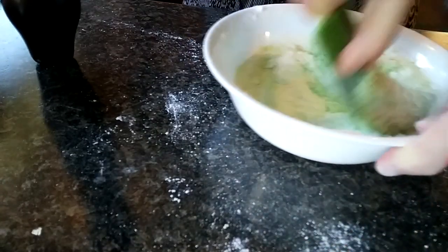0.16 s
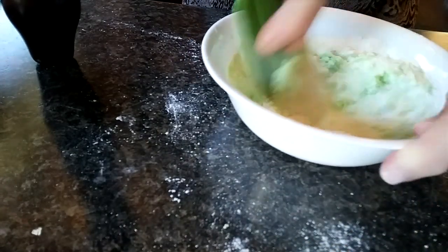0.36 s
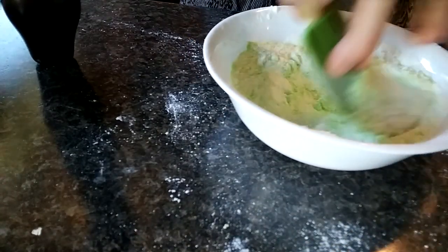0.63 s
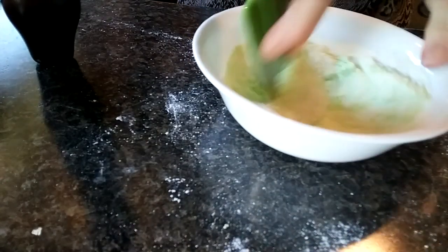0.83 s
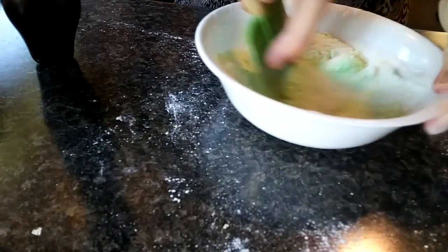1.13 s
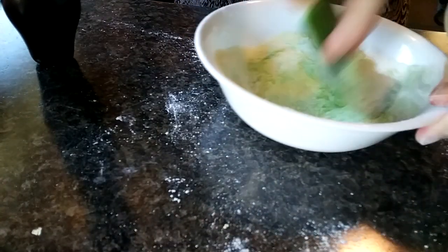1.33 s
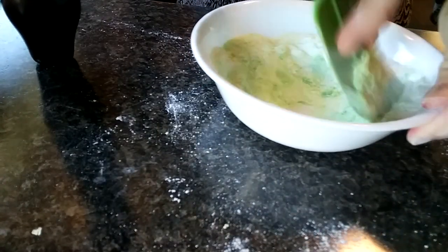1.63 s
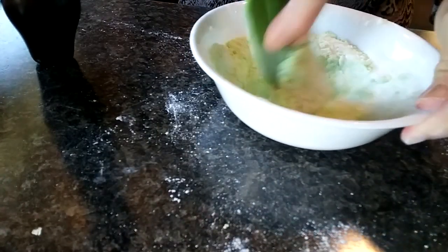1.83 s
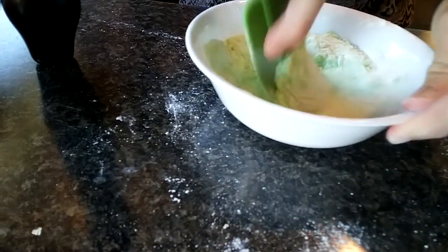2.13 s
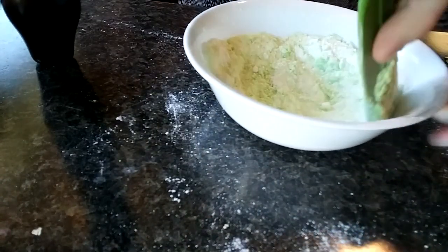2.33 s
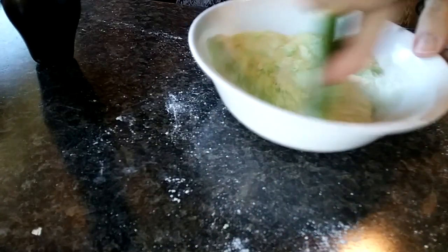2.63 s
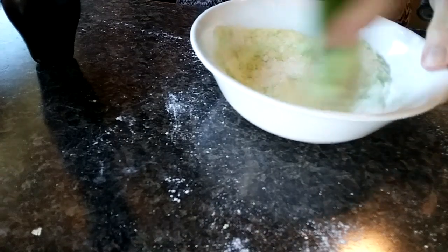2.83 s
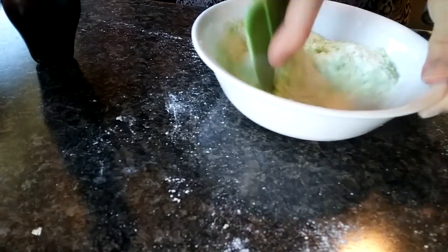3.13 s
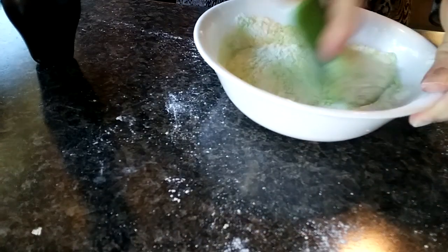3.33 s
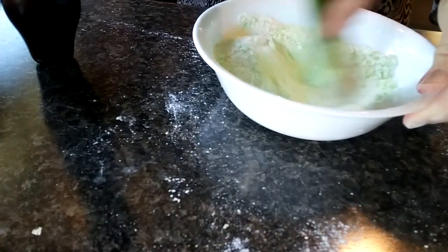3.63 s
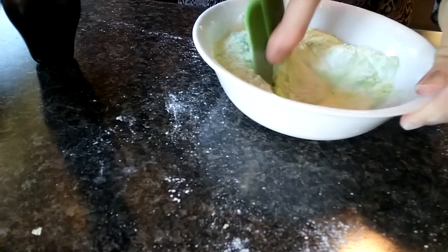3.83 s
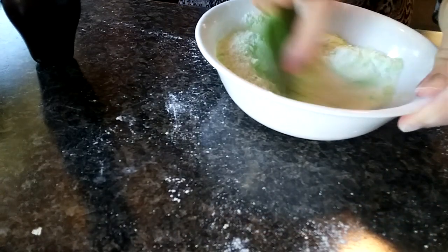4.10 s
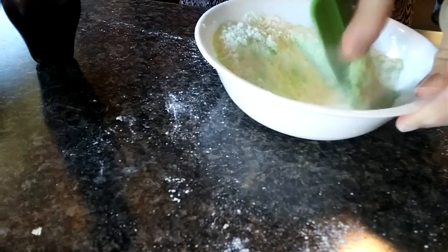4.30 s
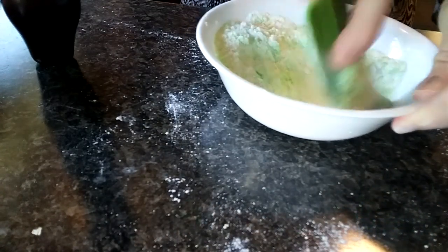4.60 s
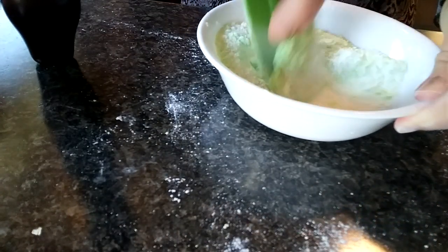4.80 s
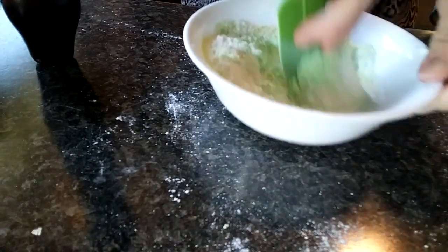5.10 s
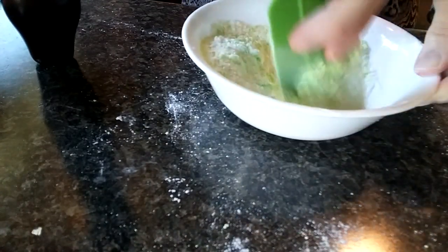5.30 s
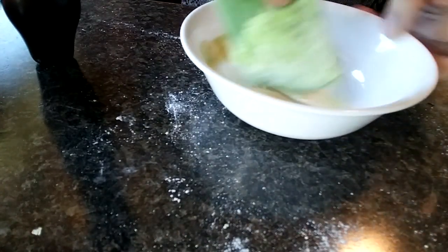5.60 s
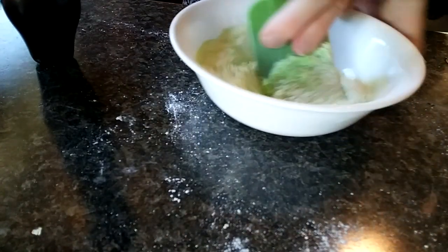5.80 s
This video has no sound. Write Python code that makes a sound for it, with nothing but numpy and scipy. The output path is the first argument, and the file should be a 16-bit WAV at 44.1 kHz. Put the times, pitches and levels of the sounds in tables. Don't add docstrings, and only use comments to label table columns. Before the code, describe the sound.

Close stereo pickup lying on a stone kitchen counter: a spatula sweeps damp sandy powder round a ceramic bowl, three or four uneven strokes a second. Each gives a gritty hiss, a crunch, a muffled ceramic knock and a low thud. The hardest blow comes near 1.2 seconds; near 3.3 the rim is rapped and rings briefly. Stirring continues to the end in a fairly dry room.

```python
import sys
import numpy as np
from scipy import signal
from scipy.fft import rfft, irfft
from scipy.io import wavfile

SR = 44100
rng = np.random.default_rng(int(sys.argv[2]) if len(sys.argv) > 2 else 0)


def ratio_of_db(decibels):
    return 10 ** (np.asarray(decibels, float) / 20)


def pcm_store(signal):
    levels = np.round(np.clip(np.atleast_2d(signal), -1, 1) * 32767)
    wavfile.write(sys.argv[1], SR, levels.astype(np.int16).T)


N = 262395


def rms_one(x):
    return x / np.sqrt(np.mean(x ** 2) + 1e-20)


def at_hz(points):
    hz = np.maximum(np.arange(N // 2 + 1) * SR / N, 1)
    corner_hz, value = np.array(points).T
    return np.interp(np.log(hz), np.log(np.maximum(corner_hz, 10)), value)


def colour(x, points):
    gain = rms_one(ratio_of_db(at_hz(points)))
    size = at_hz([(500, 0), (16000, 19.9)]).astype(int)
    late = rng.integers(0, SR, 20)[size] * np.arange(N // 2 + 1) / N
    return irfft(rfft(x) * gain * np.exp(-2j * np.pi * late), N)


def drift(rate):
    r = np.exp(-80 * np.pi * rate / SR)
    slow = signal.lfilter([1], [1, -2 * r, r * r], rng.standard_normal(N // 40 + 2002))[2000:]
    return np.interp(np.arange(N) / 40, np.arange(len(slow)), rms_one(slow))


def ring(force, hz, t60):
    r, w = ratio_of_db(-60 / (t60 * SR)), 2 * np.pi * hz / SR
    return signal.lfilter([0, np.sin(w)], [1, -2 * r * np.cos(w), r * r], force + 1e-18)


def grit(per_s, spread_db, alike):
    sizes = ratio_of_db(spread_db * np.minimum(rng.exponential(1, (2, N)), 4))
    sizes *= rng.choice([-1, 1], (2, N))
    mid, side = rms_one(sizes * (rng.random((2, N)) < per_s / SR))
    alike = np.clip(alike, 0, 1)
    return (np.sqrt(1 + alike) * mid + np.sqrt(1 - alike) * side * [[1], [-1]]) / np.sqrt(2)


def faster(modes, share):
    return [(hz, db, t60 * share) for hz, db, t60 in modes]


def rubbed(force, modes):
    flare_db, flares_per_s = 2.5, 12
    total = 0
    for k, (hz, level_db, t60) in enumerate(modes):
        level = ratio_of_db(level_db + flare_db * drift(flares_per_s))
        total = total + level * ring(force, hz, t60) * (-1) ** k
    return rms_one(total)


def strike(events, modes, vary_db, damping, width, press_s, detune=0):
    rows = np.array(events)
    at = np.round(rows[:, 0] * SR).astype(int)
    hard = rows[:, 2] if rows.shape[1] > 2 else np.zeros(len(at))
    share = rows[:, 3] if rows.shape[1] > 3 else np.ones(len(at))
    luck, side, load = np.moveaxis(rng.standard_normal((len(at), 3, len(modes))), 1, 0)
    hz, level_db, t60 = np.transpose(modes)[:, :, None]
    t, out = np.arange(SR // 4) / SR, np.zeros((2, N + SR))
    press = (1 - np.exp(-t / press_s)) ** 2
    for i, start in enumerate(at):
        tilt_db = hard[i] * np.log2(hz / modes[1][0])
        height = ratio_of_db(rows[i, 1] + level_db + tilt_db + vary_db * luck[i, :, None])
        decay = ratio_of_db(-60 * t / (t60 * damping * max(share[i], .05)))
        tone = np.sin(2 * np.pi * hz * (1 + detune * load[i, :, None]) * t)
        lean = width * side[i] * np.minimum(hz[:, 0] / 300, 1)
        out[:, start:start + len(t)] += np.array([1 + lean, 1 - lean]) @ (height * decay * tone * press)
    return out[:, :N]


def soft(x, contact_hz):
    return signal.sosfilt(signal.butter(3, contact_hz, fs=SR, output="sos"), x)


# (f/Hz, density/dB per Hz)
ROOM_TONE = [(30, -22), (70, -31), (200, -66), (550, -56), (1100, -6), (4000, -2), (7000, -8.5),
             (16000, -13)]


def room_tone():
    return ratio_of_db(-74.5) * colour(grit(40000, spread_db=.1, alike=.6), ROOM_TONE)


# (t/s, fade/ms, coarse level/dB, fine level/dB)
SWEEPS = [(0.039, 88, -46, -47), (0.294, 38, -59.5, -60), (0.404, 55, -40.5, -42), (0.829, 46, -53, -55),
          (0.921, 52, -36, -60), (1.139, 61, -48, -46.5), (1.251, 43.5, -36.5, -43.5),
          (1.444, 62, -55, -55.5), (1.572, 50.4, -43.5, -44.5), (1.886, 60.4, -45.5, -47.5),
          (2.102, 27, -45, -44), (2.194, 76, -45, -49), (2.508, 41, -88, -51.5), (2.682, 66, -48.5, -42),
          (2.85, 42, -43, -45.5), (3.206, 48, -47.5, -47), (3.35, 58, -64, -59), (3.63, 44.6, -48.5, -52.5),
          (3.927, 50, -46, -48), (4.02, 50, -65.5, -70), (4.121, 23, -53.5, -52.5), (4.33, 51, -63.5, -70),
          (4.46, 25, -64, -59), (4.63, 36, -68, -71), (4.221, 51, -44, -46), (4.53, 49, -42.5, -45.5),
          (4.844, 42.6, -40.5, -45), (4.968, 430, -67, -65), (5.263, 46.5, -42, -49),
          (5.491, 58, -46.5, -48), (5.558, 40, -50.5, -50), (5.895, 81, -51, -49)]
# (t/s, fade/ms, coarse level/dB, fine level/dB)
DIGS = [(0.108, 59, -57.5, -68), (0.468, 43, -46, -49.5), (0.538, 42, -63, -59), (0.6, 74, -73, -66),
        (0.687, 230, -64, -61), (0.978, 80, -47.5, -58.5), (1.28, 82, -44.5, -58),
        (1.628, 46, -53.5, -53.5), (1.788, 51, -44.5, -49.5), (2.387, 60, -46, -49.5),
        (2.495, 37, -61.5, -67), (2.73, 49, -44.5, -47.5), (2.925, 160, -54.5, -60.5),
        (3.049, 37, -46.5, -44.5), (3.096, 37, -51.5, -50.5), (3.278, 36, -48.5, -42),
        (3.415, 96, -58.5, -56), (3.5, 130, -59, -57), (3.56, 50, -60.5, -65), (4.421, 24, -51, -44.5),
        (4.756, 35, -55, -52), (5.133, 47, -40, -41.5), (5.682, 72, -50.5, -50.5), (5.736, 83, -54, -58),
        (5.795, 45, -55, -52.5)]


def drags():
    swell_share, dig_ms = 0.82, 16.8
    fine, coarse = np.zeros((2, N))
    clock = np.arange(N) / SR
    moves = [(swell_share * row[1], *row) for row in SWEEPS] + [(dig_ms, *row) for row in DIGS]
    for swell_ms, s, fade_ms, coarse_db, fine_db in moves:
        near = slice(max(round((s - .3) * SR), 0), round((s + .4) * SR))
        span_ms = np.where(clock[near] < s, swell_ms, fade_ms)
        away = np.abs(clock[near] - s) * 1000 / span_ms
        fine[near] += ratio_of_db(2 * (fine_db - 8 * away ** 1.8))
        coarse[near] += ratio_of_db(2 * (coarse_db - 9 * away ** 1.8))
    return fine, coarse


# (t/s, level/dB, coarse share/dB)
SNAPS = [(0.1373, -35, -0.5), (0.271, -34, -19), (1.1464, -16.5, -7.5), (1.783, -15.5, -30),
         (1.7984, -48, -9), (1.811, -24.5, 1.5), (2.7694, -50, -6.5), (3.262, -11, -31), (3.8044, -51, 1),
         (4.421, -26, -7.5), (5.212, -32, -15)]
# (t/s, level/dB, coarse share/dB)
SKIDS = [(0.253, -40.5, -18), (0.3501, -39.5, -3), (0.87, -35, -6), (0.9213, -41.5, 19),
         (1.1276, -23.5, -6.5), (1.437, -35.5, -6.5), (1.7683, -29, -7), (2.6, -30.5, -22),
         (3.03, -33, -11), (3.81, -32.5, -14), (4.746, -32.5, -11), (5.0534, -40, -7), (5.091, -37, -6),
         (5.1248, -40.5, 8), (5.1327, -25, -25), (5.475, -30.5, -8.5)]
# (t/s, level/dB, coarse share/dB)
CRUNCHES = [(0.6603, -32.5, -36), (0.79, -38, -29), (0.891, -25, -7), (0.9032, -24.5, 4.5),
            (1.2118, -16, -9.5), (1.2284, -10.5, -5.5), (1.483, -24, -6.5), (2.0703, -30.5, -8.5),
            (2.086, -12.5, -9.5), (2.111, -23, -4.5), (2.377, -32, -26), (2.6664, -28.5, -10),
            (2.915, -31, -7.5), (3.4092, -37, -15), (4.119, -36.5, -31), (4.404, -26, -16.5),
            (4.714, -45.5, -4), (5.08, -23, -13), (5.4219, -27, -7), (5.7818, -30.5, -41)]


def bites():
    fine, coarse = np.zeros((2, N))
    t = np.arange(4096) / SR
    for length_ms, table in [(5.4, SNAPS), (7.9, CRUNCHES), (19, SKIDS)]:
        shape = (1 - np.exp(-t / .002)) * np.exp(-(t * 1000 / length_ms) ** 1.6)
        for s, peak_db, coarse_db in table:
            at = round(s * SR)
            fine[at:at + 4096] += (ratio_of_db(peak_db - 10.5) * shape)[:N - at] ** 2
            coarse[at:at + 4096] += (ratio_of_db(peak_db + coarse_db - 3.0) * shape)[:N - at] ** 2
    return fine, coarse


def from_blade(x, swing):
    lag = swing * drift(4.63)
    return np.array([x[0], np.interp(np.arange(N) + lag, np.arange(N), x[1])])


def patchy(x, low_hz, high_hz, depth_db, rate):
    place = at_hz([(low_hz, 0), (high_hz, 11)])
    spectrum, total = rfft(x), 0
    for k in range(12):
        part = irfft(spectrum * np.sqrt(np.clip(1 - abs(place - k), 0, 1)), N)
        total = total + part * ratio_of_db(depth_db * drift(rate))
    return total / np.sqrt(2)


# (f/Hz, density/dB per Hz)
FINE = [(3000, -23), (4200, -7), (5500, -3.5), (6400, -1.5), (7500, -2), (10500, -0.5), (12500, -9),
        (16000, 1)]
# (f/Hz, density/dB per Hz)
COARSE = [(700, 5.5), (1100, -2), (1600, -1), (2200, -1), (3000, -0.5), (4000, -3.5), (6500, -20)]


def hiss(slip, fine_height, coarse_height):
    fine = colour(from_blade(grit(20000, spread_db=2.5, alike=0.22), swing=4.98), FINE)
    coarse = colour(from_blade(grit(8000, spread_db=5.5, alike=0.94), swing=6.28), COARSE)
    both = fine * fine_height * ratio_of_db(.5 * slip)
    both += coarse * coarse_height * ratio_of_db(-2.0 + 0.3 * slip)
    return patchy(both, 1040, 12770, depth_db=3.0, rate=28.6)


# (f/Hz, level/dB, t60/s)
GLAZE = [(1694, -18, 0.11), (1860, -27, 0.054), (2207, -3, 0.11), (2570, -40, 0.062), (2830, 16.5, 0.04),
         (3350, 12, 0.0044), (4410, 23, 0.015), (5550, 27.5, 0.0056), (6380, 18, 0.046), (6460, 13, 0.014),
         (7060, -27, 0.012), (7430, 11, 0.024), (10000, -11, 0.0098)]


def glaze(fine_height, coarse_height):
    sing = rubbed(grit(3000, spread_db=2.5, alike=0.17), faster(GLAZE, 0.44))
    return sing * np.hypot(fine_height, coarse_height) * ratio_of_db(-14.5)


# (f/Hz, level/dB, t60/s)
BOWL = [(428, -4, 0.03), (523.5, 0, 0.096), (559.8, -2, 0.22), (609.8, -3.5, 0.17), (671, -6, 0.17),
        (776.4, -1, 0.076), (868, -5, 0.081), (950, -12.5, 0.089), (1285, -10.5, 0.075),
        (1436, -12.5, 0.035), (1710, -13, 0.084), (2135, -12, 0.042), (2593, -20.5, 0.048)]


def drone(slip, drone_db, rock, coarse_height):
    shake_top = ratio_of_db(-34)
    body = rubbed(grit(1200, spread_db=4.0, alike=0.66) * ratio_of_db(1.9 * slip), faster(BOWL, 0.75))
    shake = shake_top * np.tanh(ratio_of_db(-0.5) / shake_top * coarse_height)
    return body * np.hypot(ratio_of_db(drone_db - 10.5) + ratio_of_db(-12) * rock, shake)


# (f/Hz, level/dB, t60/s)
COUNTER = [(56, -15.5, 0.21), (70.4, -14, 0.46), (87, -5, 0.17), (120.8, -9, 0.094), (129.5, -6, 0.1),
           (185.3, 2, 0.062), (202.5, 5.5, 0.03), (272, -7, 0.064), (352, -9, 0.053)]


def rumble(slip, drone_db, rock, coarse_height):
    body = rubbed(grit(900, spread_db=2.5, alike=0.98) * ratio_of_db(0.49 * slip), COUNTER)
    steady_db = -56.5 + 0.67 * (drone_db - drone_db.mean())
    grating = signal.sosfilt(signal.butter(2, 120, "high", fs=SR, output="sos"), body)
    rocked = soft(body, contact_hz=156) * rock * ratio_of_db(5.0)
    return body * ratio_of_db(steady_db) + rocked + grating * ratio_of_db(-4.5) * coarse_height


# (t/s, level/dB)
PRESSURE = [(0.0, -53.5), (0.78, -47), (1.11, -36.5), (1.82, -61.5), (2.3, -47), (2.45, -57), (2.65, -56),
            (2.85, -48), (3.26, -41), (3.68, -64), (3.88, -59.5), (4.04, -54.5), (4.61, -66), (5.09, -50.5),
            (5.24, -34), (5.58, -67.5), (5.8, -43.5), (5.95, -43)]


def stirring():
    s, level_db = np.transpose(PRESSURE)
    drone_db = np.interp(np.arange(N) / SR, s, level_db)
    rock, slip = rocking(), drift(11.3)
    fine_height, coarse_height = np.sqrt(np.add(drags(), bites()))
    air = hiss(slip, fine_height, coarse_height) + glaze(fine_height, coarse_height)
    return air + drone(slip, drone_db, rock, coarse_height) + rumble(slip, drone_db, rock, coarse_height)


# (t/s, level/dB)
CHINKS = [(0.256, -51), (0.272, -50), (0.535, -50), (0.661, -48), (0.79, -52), (2.378, -45.5), (2.6, -50),
          (2.62, -42), (3.815, -53), (5.785, -51.5), (5.8, -49)]
# (f/Hz, level/dB, t60/s)
CHINK = [(6290, 0, 0.029), (6530, -3.5, 0.043), (7700, -22, 0.012), (10900, 0, 0.024)]


def chinks():
    return strike(CHINKS, CHINK, vary_db=5.0, damping=0.77, width=0.53, press_s=0.0014)


# (t/s, level/dB, hardness/dB, rebound/dB)
THUDS = [(0.257, -14.5, -15, -23), (0.666, -23.5, -12, -8), (0.797, -22.5, -14, -30),
         (1.094, -31, 4.5, -32), (1.231, -0.5, -2.5, -30), (1.434, -15, -6, -2), (1.778, -17.5, -4, -30),
         (2.075, -17.5, -11, -32.5), (2.203, -19.5, -25, 3), (2.103, -13.5, -5, 2.5), (2.379, -22, 1, -32),
         (2.602, -28, -5.5, -28), (2.667, -18.5, -7.5, -33), (2.805, -12, -1, -14),
         (2.828, -22, -2.5, -31.5), (3.032, -29, -8, -34), (3.138, -15, 2, -11), (3.201, -35, 7.5, -28),
         (3.404, -22, -1.5, -32), (3.802, -27, -7.5, 4.5), (4.103, -26.5, -0.5, -23),
         (4.402, -15.5, -11.5, 3), (4.714, -18, 1, -29), (4.748, -48, 12.5, -30.5), (5.044, -14.5, -4, -7),
         (5.147, -14, -6.5, -30), (5.2153, -25, -2, -37), (5.225, -19, -3, -38), (5.239, -18, 2, -30.5),
         (5.42, -18.5, 0, -15), (5.783, -40, -1, -30)]


def thuds():
    rebound_s = 0.01093
    jolts = []
    for s, db, hard, again_db in THUDS:
        jolts += [(s, db, hard), (s + rebound_s, db + again_db, hard)]
    jolts = [row for row in jolts if row[1] > -50]
    stone = strike(jolts, COUNTER, vary_db=2.0, damping=.8, width=0.39, press_s=0.0005)
    return soft(ratio_of_db(-14) * stone, contact_hz=450)


def rocking():
    level_db, t60_s, rise_s = -27, .55, .02
    grid = np.arange(0, N, 64)
    s, peak_db = np.transpose([row[:2] for row in THUDS + RAP])
    since = np.maximum(grid / SR - s[:, None], 0)
    power = ratio_of_db(2 * (peak_db[:, None] + level_db - 60 * since / t60_s)) * (1 - np.exp(-since / rise_s))
    return np.interp(np.arange(N), grid, np.sqrt(power.sum(axis=0)))


# (t/s, level/dB, brightness/dB, ring share left by powder and hand/1)
KNOCKS = [(0.29, -29.5, -1, 0.54), (0.3925, -20.5, 8, 0.21), (0.431, -25.5, -7, 0.42),
          (0.875, -30, 8, 0.75), (0.9045, -36, 4, 0.12), (0.92, -20, -2, 0.5), (0.929, -21.5, 18.5, 0.24),
          (0.94, -40, -4, 0.3), (1.131, -55, -1, 0.39), (1.2125, -19.5, 10, 0.23), (1.2316, -4.5, 5, 0.23),
          (1.778, -14.5, 6.5, 0.22), (1.811, -35, 10, 0.25), (1.83, -29, -15, 0.52),
          (1.852, -29, -21, 0.56), (2.074, -27, -5, 0.38), (2.088, -29.5, -7, 0.47), (2.377, -28, -1, 1),
          (2.686, -29, 1, 0.91), (2.728, -28, -3, 0.88), (2.766, -22, -3, 0.27), (2.773, -21, -6, 0.76),
          (2.807, -28, 6.5, 0.53), (3.036, -29, -21, 1), (3.111, -26, -3, 0.54), (3.139, -14, -26, 0.31),
          (3.406, -29, -9, 0.61), (4.713, -24, -0.5, 0.3), (5.045, -27.5, -12, 0.54), (5.077, -26, -6, 0.8),
          (5.09, -31.5, 3, 1), (5.118, -28.5, 8, 0.93), (5.134, -21, 3, 0.34), (5.143, -30, 6, 0.17),
          (5.214, -19, -2, 0.093), (5.25, -37, 2, 0.45), (5.283, -27, -21, 0.43), (5.622, -39, -6, 0.95),
          (5.781, -33, -6, 0.97), (5.792, -37, -2, 0.77), (5.822, -32.5, -2, 0.92), (5.842, -45, -6, 0.54)]


def knocks():
    wall = strike(KNOCKS, BOWL, vary_db=3.0, damping=0.77, width=0.34, press_s=0.0012, detune=0.031)
    return soft(ratio_of_db(-8.0) * wall, contact_hz=1350)


# (t/s, level/dB, contact/ms)
SLAPS = [(0.29, -30, 1.94), (0.9033, -19, 0.68), (3.264, -21, 0.97), (1.779, -26, 0.57),
         (3.1118, -25, 1.24), (3.8045, -44, 1.3), (4.4043, -52, 0.8), (5.2158, -19, 1.32),
         (5.2269, -24, 2.1), (5.2404, -21, 1.9), (5.4236, -25.5, 0.73)]


def slaps():
    out, t = np.zeros(N), np.arange(256) / SR
    for s, peak_db, contact_ms in SLAPS:
        at = round(s * SR)
        phase = np.minimum(t * 1000 / contact_ms, 1)
        out[at:at + 256] += ratio_of_db(peak_db) * np.sin(np.pi * phase) ** 2
    return out


# (t/s, level/dB, length/ms, top f/Hz)
TICKS = [(0.7692, -48, 4, 12000), (0.9053, -21, 2.3, 8000), (0.93, -36, 3, 6000), (1.2278, -20, 3.4, 14000),
         (1.798, -25, 1.8, 12960), (1.8134, -33, 1.3, 12960), (2.4873, -49, 6, 12000),
         (2.599, -28, 3.2, 13800), (2.6528, -43, 1.5, 12000), (2.6792, -23.5, 5.7, 9000),
         (2.701, -25, 1.5, 14000), (2.7145, -32, 1.4, 14000), (2.735, -31, 2, 9000),
         (2.741, -28, 1.4, 12100), (2.826, -47, 4.6, 7407), (3.114, -40, 3, 12960),
         (3.2631, -12.5, 3.5, 9100), (3.801, -65, 2.7, 12000), (4.1134, -51, 4, 11110),
         (5.122, -37, 3, 11110)]


def ticks():
    low_hz = 2920
    out, t = np.zeros((2, N)), np.arange(2048) / SR
    for s, peak_db, length_ms, top_hz in TICKS:
        at = round(s * SR)
        mid, side = rng.standard_normal((2, 2048))
        burst = (mid + side * [[1], [-1]]) * np.exp(-(t * 1000 / length_ms) ** 2)
        band = signal.butter(3, [low_hz, top_hz], "band", fs=SR, output="sos")
        out[:, at:at + 2048] += ratio_of_db(peak_db - 12) * signal.sosfilt(band, burst)
    return out


# (t/s, level/dB)
RAP = [
    (3.264, -16.5),
]
# (f/Hz, level/dB, t60/s)
RIM = [(242.5, -12, 0.81), (308, -9, 0.4), (343, -14, 0.22), (353.5, 0, 0.32), (474, -5.5, 0.11),
       (570, 0, 0.11), (584, -23, 0.3), (767, 8.5, 0.058), (806, -0.5, 0.13), (850, -12, 0.46),
       (911, -16, 0.3), (921, 3.5, 0.087), (1097, -6, 0.09), (1320, -10, 0.12)]


def rap():
    chatter_db, chatter_t60_s = -31.5, .45
    blow = strike(RAP, RIM, vary_db=0, damping=.7, width=.25, press_s=.001)
    since = np.arange(N) / SR - RAP[0][0]
    fading = (since > 0) * ratio_of_db(-60 * abs(since) / chatter_t60_s)
    chatter = rubbed(grit(690, spread_db=5.5, alike=0.11), faster(RIM, 1 / 3))
    blow += ratio_of_db(chatter_db + 7.5) * fading * chatter
    return soft(ratio_of_db(-7.5) * blow, contact_hz=1560)


def kitchen(x):
    t60_s, wall_cut_hz = .3, 7000
    out, dull = np.zeros((2, N)), np.exp(-2 * np.pi * wall_cut_hz / SR)
    lags = (rng.uniform(0.0064, 0.034, 16) * SR).astype(int)
    for k, lag in enumerate(lags):
        loop, gain, state = x.copy(), ratio_of_db(-60 * lag / SR / t60_s), [0.]
        for i in range(lag, N, lag):
            back, state = signal.lfilter([gain * (1 - dull)], [1, -dull], loop[i - lag:i], zi=state)
            loop[i:i + lag] += back[:N - i]
        out[k % 2] += (loop - x) * (-1) ** (k // 2)
    return out


def scene():
    near = stirring() + chinks() + thuds() + knocks() + slaps() + ticks() + rap()
    airborne = signal.sosfilt(signal.butter(2, 200, "high", fs=SR, output="sos"), near.mean(axis=0))
    return near + ratio_of_db(-21) * kitchen(airborne) + room_tone()


def top_cut(x):
    return signal.sosfilt(signal.butter(12, 16660, fs=SR, output="sos"), x)


# (f/Hz, left level/dB, right level/dB)
PORTS = [(93, 3, 3.5), (4800, 0.5, 0.5), (7280, 7.5, 3), (8470, -2, 2), (8900, -20, -5), (9870, -19, 5),
         (9900, -8.5, 6), (13100, -1, 5.5), (15700, -13, 2.5), (15700, -44, -47)]


def record(dry):
    hz, left_db, right_db = np.transpose(PORTS)
    response = ratio_of_db(np.array([at_hz(np.c_[hz, left_db]), at_hz(np.c_[hz, right_db])]))
    ports = irfft(rfft(dry) * response, N)
    mix = signal.sosfilt(signal.butter(7, 52, "high", fs=SR, output="sos"), ports)
    return top_cut(mix)


dry = scene()
out = record(dry)
pcm_store(out)
```